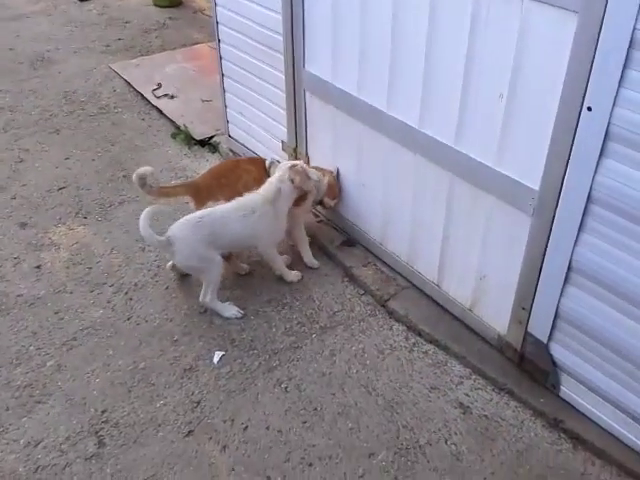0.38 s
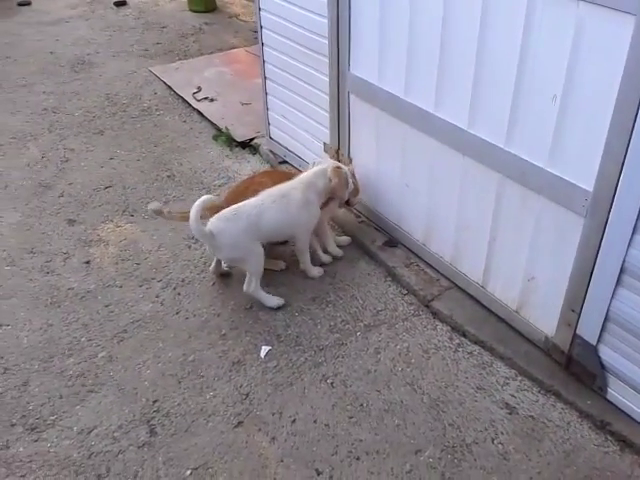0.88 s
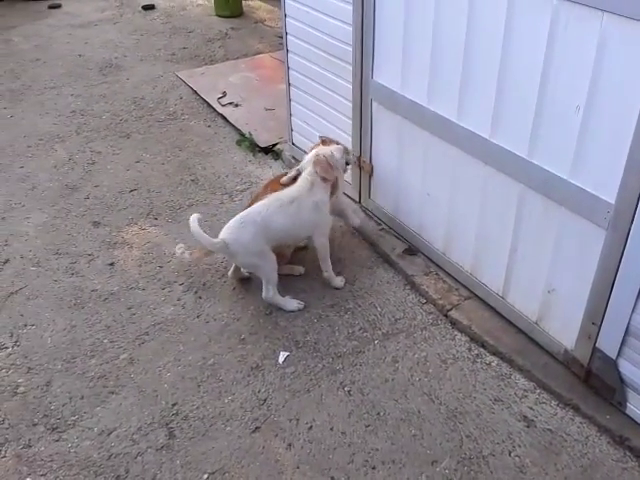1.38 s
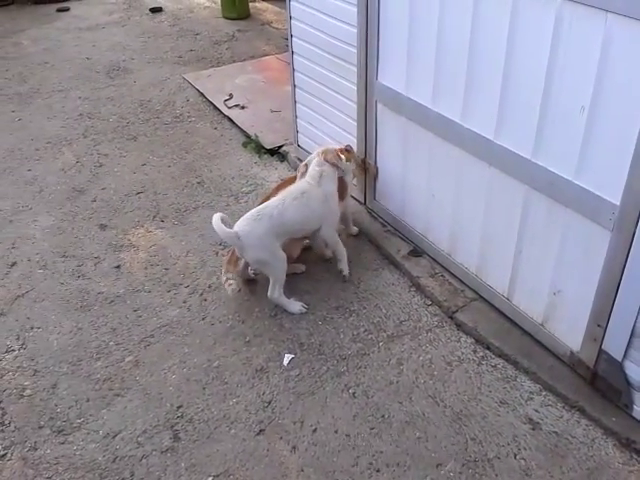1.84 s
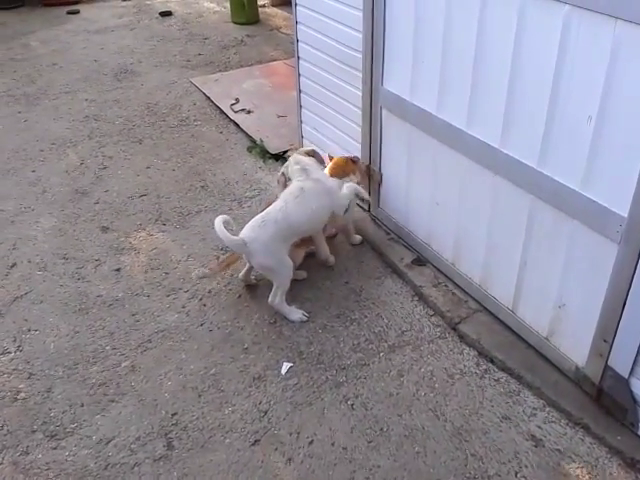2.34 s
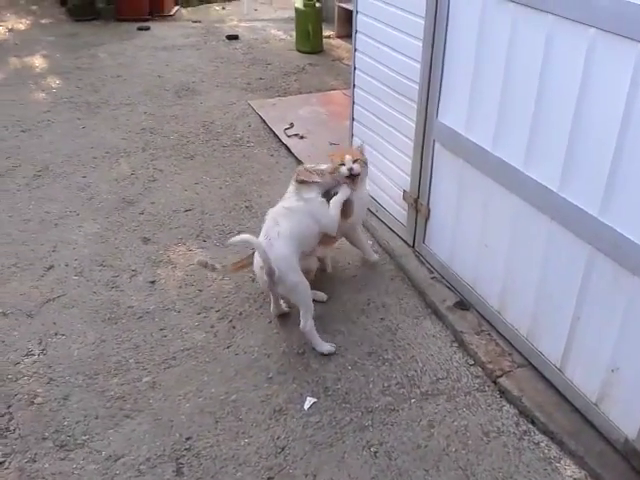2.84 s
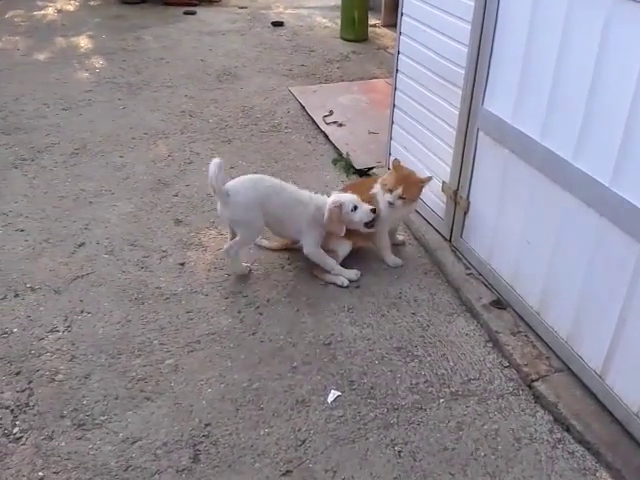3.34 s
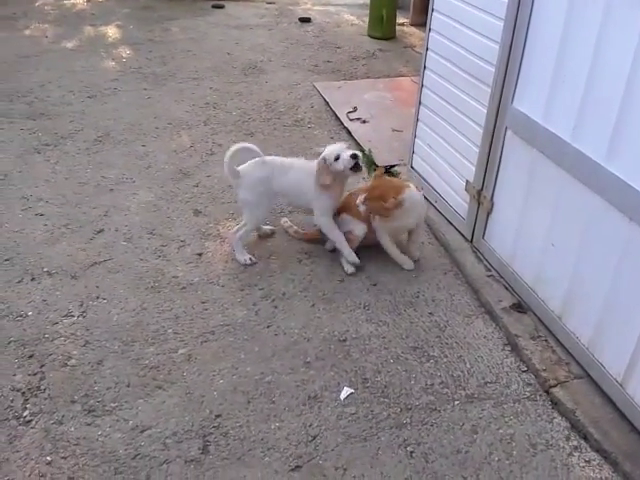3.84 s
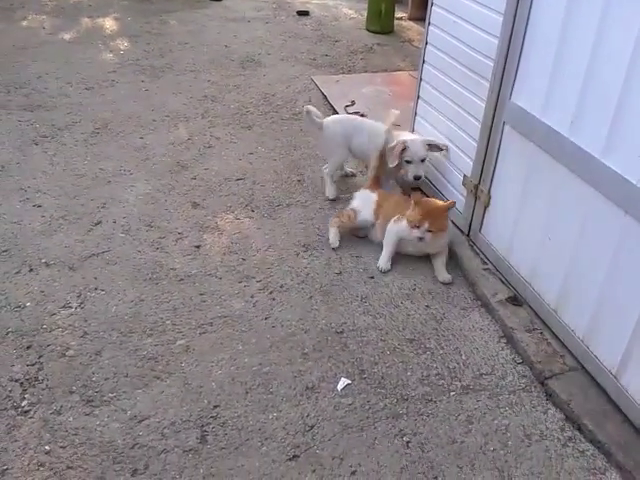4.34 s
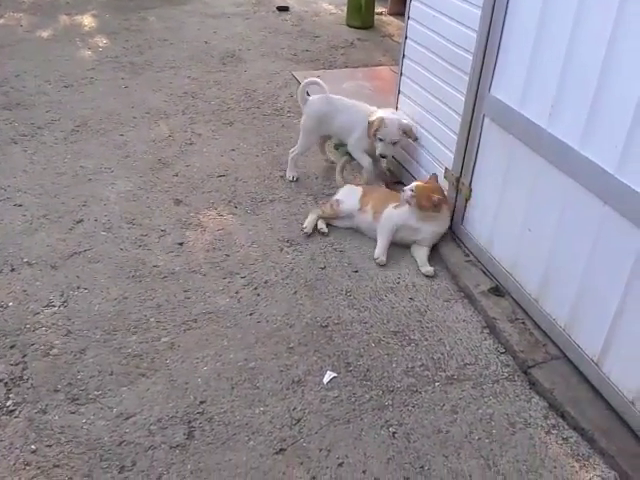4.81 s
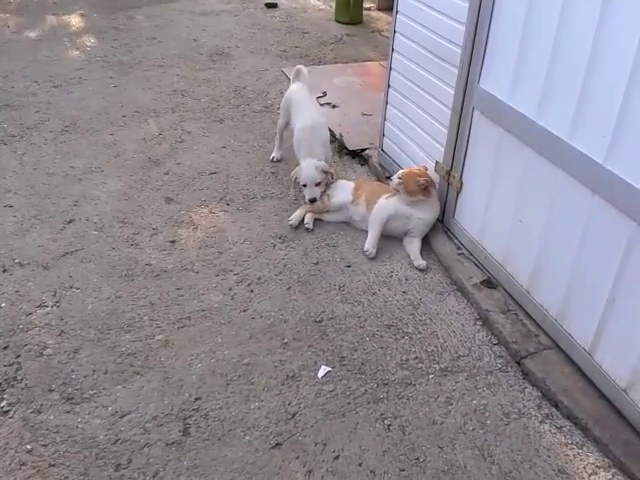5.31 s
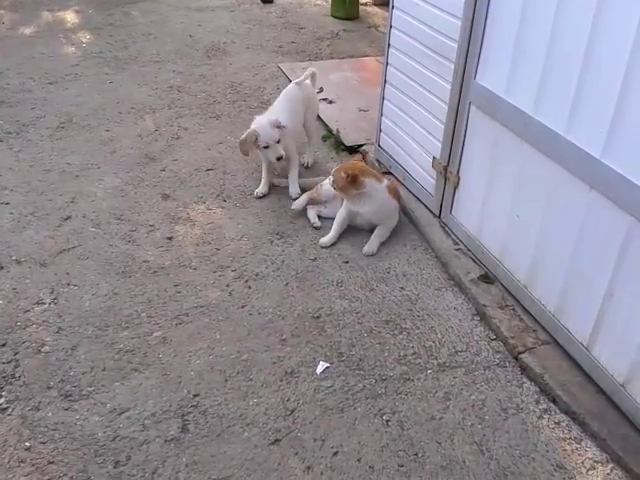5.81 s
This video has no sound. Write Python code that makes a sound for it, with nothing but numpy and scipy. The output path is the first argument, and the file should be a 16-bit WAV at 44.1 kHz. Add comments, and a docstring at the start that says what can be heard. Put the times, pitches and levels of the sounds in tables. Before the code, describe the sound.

A mono outdoor take of a puppy and a cat play-fighting on gritty concrete by a shed, over soft, steady hiss with barely audible low tones. The puppy opens with a fading breathy growl, then a sharper, higher snarl at 0.2-0.4 s trailing into a grumble. Dry paw scuffs and dense claw clicks run through the first second. A lower growl peaks near 1.05 s; ticks thin out while faint grumbling continues to 2.3 s. A short growl at 2.5 s runs into the cat's single yowl, 2.5-2.9 s, high, raspy, wavering and falling, with a hissy edge. Then comes near quiet with small scratches at 3.2-3.3 s. A snarl swells at 3.75-4.0 s, rises into a thin whine until 4.35 s, and ends in a gruff grunt. Scuffs and claw clicks cluster near 4.75 s. After a lull, the loudest, brightest snarl bursts at 5.5 s and dies away with a last scrape. Reflections are short and faint.

```python
"""A concrete yard beside a shed: a puppy growls and snarls while wrestling a cat, which yowls once.
The voices are uneven vocal-fold pulses and breath noise, shaped by moving resonances.
Paws scuff as dense grains of grit and claws tick as short ringing snaps; a sparse decaying echo
from ground and wall follows. Behind it all lies a faint outdoor hiss with two weak tones."""
import sys
import numpy as np
from scipy import signal
from scipy.fft import rfft, irfft
from scipy.io import wavfile
from scipy.ndimage import uniform_filter1d

SR = 44100
rng = np.random.default_rng(int(sys.argv[2]) if len(sys.argv) > 2 else 0)


def volts_from_db(level):
    """Convert decibel levels to linear amplitude ratios."""
    exponent = np.asarray(level, float) / 20
    return 10 ** exponent


def log_audio(samples):
    """Write samples as a 16-bit WAV file to the path given in sys.argv[1]."""
    # one column per channel
    frames = np.atleast_2d(samples).T
    # limit to full scale, then quantise
    limited = np.clip(frames, -1, 1)
    pcm = np.round(limited * 32767).astype(np.int16)
    wavfile.write(sys.argv[1], SR, pcm)


N = 261954

# Puppy, one curve per call: t/s, level through the mouth/dB, pulse rate f/Hz, mouth resonance f/Hz
PUPPY_CALLS = [
    [(0.0, -33.5, 250, 1884), (0.08, -52, 184, 1420)],
    [(0.215, -57.5, 242, 1740), (0.243, -27.5, 325, 1877), (0.318, -25.5, 328, 2130),
     (0.335, -35, 284, 1852), (0.37, -42, 256, 1564), (0.42, -44, 212, 1572), (0.496, -36, 224, 1620),
     (0.62, -59, 176, 1252)],
    [(0.89, -48.5, 135, 935), (0.965, -33, 190, 1469), (1.054, -26, 208, 1540), (1.12, -37, 190, 1510),
     (1.164, -42.5, 170, 1270), (1.4, -53, 138, 790)],
    [(1.514, -56, 174, 996), (1.8, -68.5, 98, 1011)],
    [(1.86, -58.5, 180, 1202), (1.9, -49, 210, 1276), (2.0, -49.5, 200, 1360), (2.15, -48.5, 170, 1590),
     (2.31, -56.5, 170, 1470)],
    [(2.35, -44, 165, 1420), (2.376, -39, 135, 1605), (2.45, -33.5, 132, 2147), (2.476, -28, 157, 2250),
     (2.512, -33, 140, 2260), (2.54, -62, 380, 2227)],
    [(3.73, -79, 176, 1424), (3.752, -38.5, 165, 1499), (3.782, -31, 177, 1447), (3.798, -26.5, 185, 1491),
     (3.83, -31.5, 190, 1714), (3.86, -29.5, 247, 2055), (3.905, -25, 253, 2005), (3.925, -23.5, 231, 2074),
     (3.95, -30.5, 262, 1985), (4.01, -34.5, 260, 1890), (4.045, -35.5, 290, 1410)],
    [(4.056, -47, 418, 1570), (4.12, -39.5, 416, 1540), (4.2, -39, 388, 1513), (4.346, -46, 315, 1490)],
    [(4.382, -40.5, 268, 1516), (4.403, -33, 277, 1400), (4.455, -50.5, 150, 1610), (4.5, -82, 157, 1302)],
    [(4.73, -62, 146, 1100), (5.1, -95, 183, 1087)],
    [(5.44, -77, 177, 1149), (5.47, -41, 221, 1260), (5.486, -26, 204, 1493), (5.526, -17, 202, 2060),
     (5.562, -22, 200, 2253), (5.614, -36, 233, 2250), (5.668, -39.5, 204, 2062), (5.68, -60, 203, 2120),
     (5.75, -87, 186, 2070)],
]
# Puppy, manner from each moment on: t/s, roughness (0-1), chest resonance over pulse rate,
# upper resonance at rest f/Hz, its level/dB, treble level/dB,
# level/dB of the ring between mouth and upper resonance, level/dB of the broad ring around the upper
PUPPY_MANNER = [(0, 0.95, 2.47, 2530, -6, 9, -7, -20), (.2, 0.47, 2, 2160, -11, 0.5, -23, -20.5),
                (0.362, 0.6, 2.1, 2180, -6, 6, -4.5, -13), (.8, 0.61, 2.66, 2650, -10, 0, -13, -26.5),
                (1.0, 0.53, 2.16, 2515, -7, 3, -6.5, -22), (1.15, 0.5, 2.1, 2141, -18.5, 3, -16, -22),
                (1.461, 0.52, 2.06, 2500, -8, 2, -14, -25), (1.62, 0.46, 1.996, 2450, 0, 10, -2, -23),
                (1.84, 0.64, 1.32, 2517, -2.5, 23, -4.5, -33), (2.175, 0.7, 1.2, 2324, 6.5, 20, 0, -31),
                (2.33, 0.79, 2.14, 2250, -2.5, 9, -4.5, -37), (3.7, 0.6, 1.65, 2420, -10.5, 4, -15, -26),
                (3.869, 0.54, 2, 2460, -6.5, 1, -3, -16), (4.041, 0.49, 1, 2391, -4, -7, -2, -48),
                (4.16, 0.6, 0.96, 2260, -9, 7, -6.5, -40), (4.247, 0.58, 0.94, 1992, 1, 12, -33, -40),
                (4.36, 0.5, 2.015, 1960, -2.5, 10.5, 1.5, -29), (4.5, 0.73, 2.5, 2330, -6, 0, -12, -12),
                (4.948, 0.74, 0.88, 2304, 2, 2, -14, -17), (5.45, 0.58, 3.65, 2408, -10.5, -3, -4.5, -30),
                (5.551, 0.59, 5, 2762, -2, 13.5, -7.5, -26.5)]
# Puppy, low growl under the calls: t/s, chest level/dB, nose level/dB
PUPPY_RUMBLE = [(0, -58, -53.5), (.208, -60, -51), (.3, -48.5, -67), (.42, -57, -51), (.714, -60.5, -50.5),
                (1.054, -54, -52.5), (1.4, -84, -56), (1.514, -56.5, -54.5), (1.72, -58, -67),
                (2.024, -60, -59), (2.326, -55.5, -62), (2.39, -81, -56), (2.5, -91, -89.5),
                (2.895, -74, -52.5), (2.916, -48, -41), (2.95, -70, -68), (3.15, -85.5, -71),
                (3.19, -59, -61.5), (3.33, -76.5, -65.5), (3.72, -82, -74.5), (3.768, -50, -45.5),
                (3.934, -73, -97.5), (4.06, -59.5, -49.5), (4.346, -65, -61), (4.415, -40, -41.5),
                (4.5, -52.5, -61.5), (4.728, -49.5, -58), (5.314, -62, -74), (5.442, -52.5, -64),
                (5.478, -42, -54.5), (5.562, -64.5, -82.5), (5.674, -58, -72), (5.778, -87.5, -88.5)]
# Puppy, resonances deep in the throat at the hardest snarl: f/Hz, width/Hz, base level/dB
PUPPY_THROAT = [(3700, 520, -20), (5650, 520, -12), (7720, 540, -25)]
# Cat, the cry: t/s, level/dB, pitch f/Hz
CAT_YOWL = [(2.49, -36, 749.7), (2.551, -17, 911), (2.58, -23, 832.5), (2.608, -12, 783),
            (2.636, -12.5, 727), (2.684, -20, 668.4), (2.719, -20.5, 662.2), (2.758, -23, 637.2),
            (2.8, -17, 726), (2.833, -22, 660.5), (2.857, -16, 664), (2.885, -23.5, 690),
            (2.902, -20.5, 626.6), (2.914, -26.5, 572), (2.932, -81, 515)]
# Cat, voice and jaws: t/s, roughness (0-1), weakening of every second pulse (0-1), gape/dB,
# first mouth resonance f/Hz, second mouth resonance f/Hz
CAT_MAW = [(2.49, 0.66, 0.08, -1, 2280, 4470), (2.56, 0.6, 0.32, 8, 2570, 3930),
           (2.6, 0.74, 0.3, 3.5, 2610, 4200), (2.66, 0.59, 0.6, 1.5, 2440, 3720),
           (2.69, .33, 0.4, 18, 2434, 3340), (2.75, 0.34, 0.32, 13.5, 2350, 3180),
           (2.79, .74, 0.2, 3.5, 2700, 3524), (2.83, 0.25, 0.76, -13, 2294, 2910),
           (2.88, 0.18, 0.5, -17.5, 2190, 3420), (2.92, 0.37, 0.36, -17, 1620, 3310)]
# Cat, third mouth resonance: t/s, f/Hz, level at a middling gape/dB
CAT_THIRD_RESONANCE = [(2.49, 4400, -1.5), (2.55, 5070, -7.5), (2.62, 6170, -4.5), (2.68, 5400, -4),
                       (2.79, 6030, -5), (2.83, 5772, -7), (2.93, 6400, -2)]
# Cat, another mouth resonance, lower in pitch than the third: t/s, f/Hz, level at a middling gape/dB
CAT_SIDE_POCKET = [(2.49, 4000, -9.5), (2.62, 4730, -10.5), (2.69, 4420, -10), (2.75, 5070, -1.5),
                   (2.81, 5130, -6), (2.93, 4886, -17.5)]
# Cat, whistling gaps between the teeth: f/Hz, level/dB, width/Hz
CAT_TEETH = [(10230, 0, 2000), (11400, -2, 900), (13000, -4.5, 1200)]
# Paws dragging on grit: t of the peak/s, peak level/dB, rise/s, fade/(dB per s)
PAW_SCUFFS = [(0.0, -50, .01, 252), (.26, -49.5, 0.21, 35), (0.519, -41.5, 0.075, 113),
              (.89, -45.5, 0.079, 58), (1.05, -50, 0.15, 130), (1.51, -52.5, 0.04, 203),
              (1.72, -59.5, 0.063, 143), (1.89, -64, 0.039, 7), (2.95, -60, 0.021, 73),
              (3.18, -57, 0.012, 21.5), (4.1, -58.5, 0.44, 36), (4.404, -49, 0.061, 229),
              (4.724, -45.5, 0.017, 95), (4.87, -61, 0.05, 23), (5.62, -44.5, 0.048, 241)]
# Claw ticks: t/s, peak level/dB, pitch f/Hz
CLAW_TICKS = [(0.1535, -24, 4400), (0.3783, -22, 3840), (0.402, -25, 4550), (0.495, -27, 5000),
              (0.518, -30, 6020), (0.543, -21, 4730), (0.531, -30, 6800), (0.627, -41, 4907),
              (0.7533, -28, 3666), (0.8754, -24, 4575), (0.885, -29, 2020), (0.9361, -24.5, 3016),
              (1.262, -42, 2706), (1.3456, -36, 4060), (1.41, -38, 3990), (1.496, -27, 3040),
              (1.665, -40.5, 4990), (1.717, -31.5, 4200), (1.861, -42, 6000), (1.8921, -38, 6400),
              (2.213, -39, 4486), (3.1641, -35.5, 8860), (3.1842, -40.5, 4620), (3.2803, -28, 8780),
              (3.318, -34, 4860), (3.3383, -34.5, 4940), (4.1894, -29.5, 4113), (4.3191, -38.5, 5000),
              (4.721, -28, 4833), (4.7444, -22, 4466), (4.8178, -30, 4453), (4.936, -31, 3896),
              (5.666, -29, 1815), (5.716, -43, 4440)]
# Spectrum of grit, relative: f/Hz, level/(dB per Hz)
GRIT_SPECTRUM = [(710, -14.5), (1200, 4), (2710, -3), (3220, -2.5), (4450, 6), (9410, -15.5), (16000, -51)]
# Overall outdoor hiss: t/s, level/dB
AIR_LEVEL = [(0, -55.5), (3.0, -58.5), (3.7, -58.5), (4.5, -55.5), (5.4, -60), (5.8, -57.5), (5.94, -66.5)]
# Spectrum of the outdoor hiss, relative: f/Hz, level/(dB per Hz)
AIR_SPECTRUM = [(15, -53), (25, -15.5), (211, -1), (702, -6), (850, -14.5), (2400, -14), (4150, -11),
                (6980, -18), (17200, -16)]
# Faint steady tones: f/Hz, level/dB
HUM_TONES = [(285.3, -72), (586.8, -74.5)]


def puppy():
    """Rough flapping pulses through a mouth that opens and shuts, and through chest and nose."""
    t = np.arange(N) / SR
    calls = [row for call in PUPPY_CALLS for row in call]
    mouth_db, pulse_hz, mouth_hz = along(calls, t)
    chest_db, nose_db = along(PUPPY_RUMBLE, t)
    start, *manner = np.transpose(PUPPY_MANNER)
    now = np.clip(np.searchsorted(start, t) - 1, 0, None)
    rough, chest_ratio, rest_hz, upper_db, treble_db, between_db, broad_db = (
        uniform_filter1d(column[now], size=1300) for column in manner)

    # a mouth open past this pitch pulls the upper resonance up with it
    lift_from_hz, lift_hz_per_hz = 1896, 1.93
    upper_hz = rest_hz + lift_hz_per_hz * np.maximum(mouth_hz - lift_from_hz, 0)

    # loose folds flap under the voice, at a wandering rate
    flaps_per_s, flap_depth = 82, 0.25
    flap_hz = flaps_per_s * (1 + 0.0733 * wander(N, 600))
    flap = 1 + flap_depth * np.cos(2 * np.pi * np.cumsum(flap_hz) / SR)
    drive = flap * folds(pulse_hz, rough, 0, jitter=0.055, shimmer_db=1.2, puff=0.5)

    bright_db = 0.69 * (mouth_db + 9.0)  # harder snarls carry more treble
    # the throat shortens a little as the snarl hardens
    throat_scale = 1 + 0.004 * np.clip(bright_db, -25, 0)
    throat = [(hz * throat_scale, db + bright_db + treble_db, width) for hz, width, db in PUPPY_THROAT]

    # loud or rough: blunter resonances
    loudness = np.maximum(1 + bright_db / 12, 0)
    wide = np.clip(0.6 * loudness + 1.5 * (rough - 0.5), 0, 1)
    jaw = [(mouth_hz, 0, 230), (upper_hz, upper_db, 300)]
    mouth = tract(drive, jaw + throat, shake=0.01, flutter_db=1.2, wide=wide, count=2)
    # open cavity: rings around and below the upper resonance
    mouth += volts_from_db(broad_db) * resonate(drive, 1.1 * upper_hz, 1000)
    mouth += volts_from_db(between_db) * resonate(drive, (mouth_hz + upper_hz) / 2, 270)

    chest = resonate(drive, chest_ratio * pulse_hz, 55) + volts_from_db(-9.0) * resonate(drive, 514, 310)
    nose = resonate(drive, 768, 380)
    voice = volts_from_db(mouth_db) * evened(steep(mouth, "high", 530), 2000)
    voice += volts_from_db(chest_db) * evened(chest, 2000)
    voice += volts_from_db(nose_db) * evened(nose, 2000)
    return steep(voice, "low", 8300)


def cat():
    """A high harmonic cry that breaks into rasp, through four moving mouth resonances and the teeth."""
    t = np.arange(CAT_YOWL[0][0], CAT_YOWL[-1][0], 1 / SR)
    level_db, pitch_hz = along(CAT_YOWL, t)
    rough, weak, gape_db, first_hz, second_hz = along(CAT_MAW, t)
    third_hz, third_db = along(CAT_THIRD_RESONANCE, t)
    pocket_hz, pocket_db = along(CAT_SIDE_POCKET, t)

    # a wide gape trades the first resonance for the upper ones, in dB per dB
    gape_low, gape_high = -0.74, 0.19
    upper_db = gape_high * gape_db
    mouth = [(pocket_hz, pocket_db + upper_db, 600),
             (first_hz, gape_low * gape_db, 500),
             (second_hz, upper_db, 560),
             (third_hz, third_db + upper_db, 650)]

    drive = folds(pitch_hz, rough, weak, jitter=0.09, shimmer_db=3.0, puff=0.35)
    rasp = drive * volts_from_db(0.43 * rough * wander(len(t), 60))  # irregular throbbing
    cry = tract(rasp, mouth, shake=0.03, flutter_db=3.5)
    # wide gape: two broad rings
    cry += volts_from_db(-10.0) * resonate(rasp, 4323, 3700)
    cry += volts_from_db(-18.0) * resonate(rasp, 7600, 2000)
    # faint first partials
    lowest = volts_from_db(-24 + 4 * wander(len(t), 500)) * resonate(rasp, pitch_hz, 150)
    lowest += volts_from_db(-19) * resonate(rasp, 2 * pitch_hz, 150)
    cry = steep(cry, "high", 1436) + lowest
    cry = evened(steep(steep(cry, "high", 430), "low", 7300), 1200)

    # spit past the teeth: level relative to the cry, held in the middle, falling away on both sides
    spit_s, half_hold_s, spit_peak_db, fall_db_per_s = 2.702, 0.054, -22.5, 160
    spit_db = spit_peak_db - fall_db_per_s * np.maximum(abs(t - spit_s) - half_hold_s, 0)
    spit = evened(tract(rasp, CAT_TEETH, shake=0.03, flutter_db=4.0), 6000)
    cry += volts_from_db(spit_db) * spit

    out = np.zeros(N)
    first = round(t[0] * SR)
    out[first:first + len(t)] = volts_from_db(level_db) * cry * signal.windows.tukey(len(t), 0.04)
    return out


def paws():
    """Dragged paws set off dense grains of grit and random pebble ticks; claws add single ticks."""
    drag = drag_level(np.arange(N) / SR)
    return drag * grit_grains() + pebbles(drag) + claws()


def drag_level(t):
    """Each scuff swells linearly to its peak and fades in dB; their powers add up."""
    longest_s = 0.45  # a paw lifts after this long at most
    power = 0
    for peak_s, db, rise, fade in PAW_SCUFFS:
        swell = np.clip(1 + (t - peak_s) / rise, 0, 1)
        fall_db = fade * np.maximum(t - peak_s, 0)
        power = power + swell ** 2 * volts_from_db(2 * (db - fall_db)) * (t < peak_s + longest_s)
    return np.sqrt(power)


def grit_grains():
    """Many tiny impacts of random size over steady noise, coloured as grit."""
    grains_per_s = 2500
    size = volts_from_db(2.0 * np.minimum(rng.exponential(1, N), 5))
    grains = size * (rng.random(N) < grains_per_s / SR) * rng.standard_normal(N)
    return evened(coloured(evened(grains) + 0.57 * rng.standard_normal(N), GRIT_SPECTRUM))


def pebbles(drag):
    """Loose grit ticks at random, each a decaying burst that stands above the drag."""
    pebbles_per_s, pebble_db, decay_s = 24, 18, 0.0039
    burst = coloured(rng.standard_normal(1200), GRIT_SPECTRUM) * np.exp(-np.arange(1200) / SR / decay_s)
    strikes = drag * (rng.random(N) < pebbles_per_s / SR)
    return volts_from_db(pebble_db) * signal.oaconvolve(strikes, burst / abs(burst).max())[:N]


def claws():
    """Each tick is a snap, then a scrape, through one resonance; higher ticks are shorter and wider."""
    out = np.zeros(N)
    u = np.arange(1200) / SR
    for s, db, hz in CLAW_TICKS:
        strike = (rng.standard_normal(1200) + 6 * (u == 0)) * np.exp(-u * hz / 13)
        tick = resonate(strike, hz, 0.73 * hz)
        out[round(s * SR):][:1200] += volts_from_db(db) * tick / abs(tick).max()
    return out


def yard(x):
    """Ground and wall reflections: a short, sparse tail of random echoes."""
    u = np.arange(8000) / SR
    fall_60_db_s, gap_s, density = 0.19, 0.004, 0.05
    tail = rng.choice([-1.0, 1.0], 8000) * (rng.random(8000) < density)
    tail = tail * volts_from_db(-60 * u / fall_60_db_s) * (u > gap_s)
    return x + volts_from_db(-9.0) * signal.fftconvolve(x, tail / np.linalg.norm(tail))[:N]


def air():
    """Coloured noise as outdoor hiss with a slow waver, and narrow noise bands as faint tones."""
    level_db, = along(AIR_LEVEL, np.arange(N) / SR)
    waver_db = 0.5 * evened(uniform_filter1d(rng.standard_normal(N), size=4000))
    out = evened(coloured(rng.standard_normal(N), AIR_SPECTRUM)) * volts_from_db(level_db + waver_db)
    for hz, db in HUM_TONES:
        out += volts_from_db(db) * evened(resonate(rng.standard_normal(N), hz, 27))
    return out


def folds(hz, rough, weak, jitter, shimmer_db, puff):
    """Vocal-fold pulses, uneven in time and size, mixed with a puff of noise each cycle."""
    n = len(hz)
    wobble = evened(uniform_filter1d(rng.standard_normal(n), size=200))
    turns = np.cumsum(hz * np.clip(1 + jitter * rough * wobble, 0.3, 3)) / SR
    cycle = turns.astype(int)
    size = volts_from_db(shimmer_db * rough * rng.standard_normal(n)[cycle])
    size = size * (1 - np.clip(weak, 0, 1) * (cycle % 2))  # every second pulse is weaker
    clicks = np.diff(cycle, prepend=0) * np.sqrt(SR / hz)
    puffs = evened((0.6 + np.exp(-(turns % 1) / puff)) * rng.standard_normal(n))
    share = np.clip(rough, 0, 1)
    return size * (np.sqrt(1 - share ** 2) * clicks + share * puffs)


def tract(drive, resonances, shake, flutter_db, wide=0, count=0):
    """Resonances (f/Hz, level/dB, width/Hz) trembling as the flesh shakes; the first count are blunted."""
    n = len(drive)
    out = np.zeros(n)
    for k, (hz, db, width) in enumerate(resonances):
        level = volts_from_db(db + flutter_db * wander(n, 500))
        trembling_hz = hz * (1 + shake * wander(n, 700))
        out += level * blunted(drive, trembling_hz, width, wide * (k < count))
    return out


def blunted(x, hz, width, wide):
    """A resonance that fades from its width to twice its width as wide goes from 0 to 1."""
    return (1 - wide) * resonate(x, hz, width) + wide * resonate(x, hz, 2 * width)


def resonate(x, hz, width):
    """Shifts the curve hz to zero, smooths twice, shifts back: a steep moving resonance."""
    turn = np.exp(2j * np.pi * np.cumsum(hz * np.ones(len(x))) / SR)
    r = np.exp(-np.pi * width / SR)
    smooth = signal.lfilter([(1 - r) ** 2], [1, -2 * r, r * r], x / turn + 1e-18)
    return 2 * (turn * smooth).real


def coloured(x, points):
    """Shapes x by a spectrum, straight between its points over log frequency."""
    f, db = np.transpose(points)
    hz = np.fft.rfftfreq(len(x), 1 / SR)
    return irfft(rfft(x) * volts_from_db(np.interp(np.log(hz + 1), np.log(f + 1), db)), len(x))


def steep(x, kind, hz):
    """A sharp low-pass or high-pass cut."""
    return signal.sosfilt(signal.butter(6, hz, kind, fs=SR, output="sos"), x)


def along(rows, t):
    """Columns of a curve at times t, corners rounded over a few ms."""
    s, *columns = np.transpose(rows)
    return [uniform_filter1d(np.interp(t, s, column), size=200) for column in columns]


def wander(n, span):
    """Slow random curve of rms 1."""
    return evened(uniform_filter1d(uniform_filter1d(rng.standard_normal(n), span), span))


def evened(x, span=0):
    """Rms 1 overall, or within a sliding span of samples."""
    power = uniform_filter1d(x ** 2, span) if span else np.mean(x ** 2)
    return x / np.sqrt(abs(power) + 1e-20)


def masked(x, depth_db, bass_db):
    """Mutes every band that lies too far below the loudest band of the same moment, the bass sooner."""
    hz, _, z = signal.stft(x, SR, nperseg=2048, noverlap=1536)
    power = uniform_filter1d(abs(z) ** 2, size=8, axis=1)
    band_db = 10 * np.log10(abs(power) + 1e-20)
    allowed_db = np.interp(hz, [200, 900], [bass_db, depth_db])[:, None]
    margin_db = band_db - band_db.max(1, keepdims=True) + allowed_db
    kept = z * np.clip(margin_db / 4, 0, 1)
    return signal.istft(kept, nperseg=2048, noverlap=1536)[1][:, :N]


def scene():
    """Animals echoing in the yard, over the outdoor hiss."""
    animals = puppy() + cat() + paws()
    return (yard(animals) + air())[None]


def band_limit(x):
    """A steep low-pass at the top of the band."""
    return signal.sosfilt(signal.butter(12, 18270, fs=SR, output="sos"), x)


def record(dry):
    """The deep bass is thinned by a gentle high-pass."""
    mix = signal.lfilter(*signal.butter(1, 170, "high", fs=SR), dry)
    return band_limit(mix)


dry = scene()
out = record(dry)
log_audio(out)
```